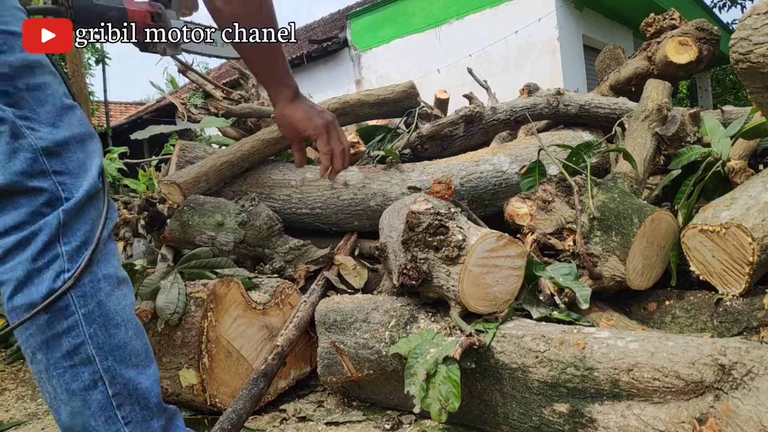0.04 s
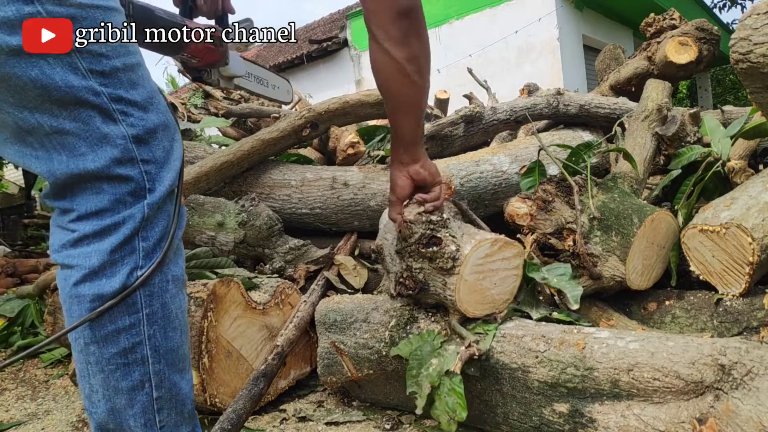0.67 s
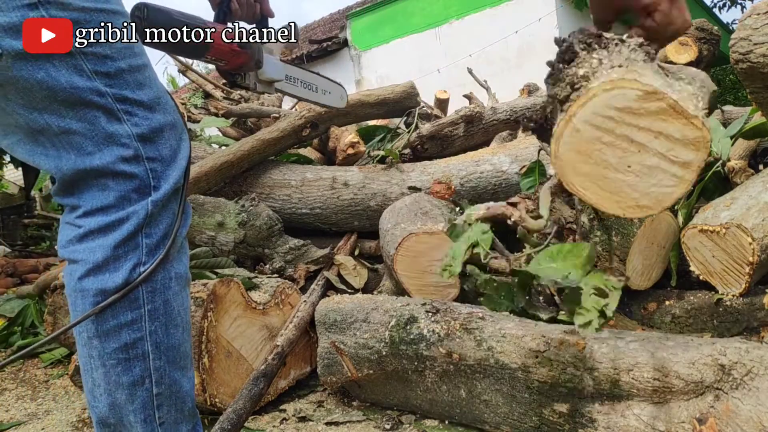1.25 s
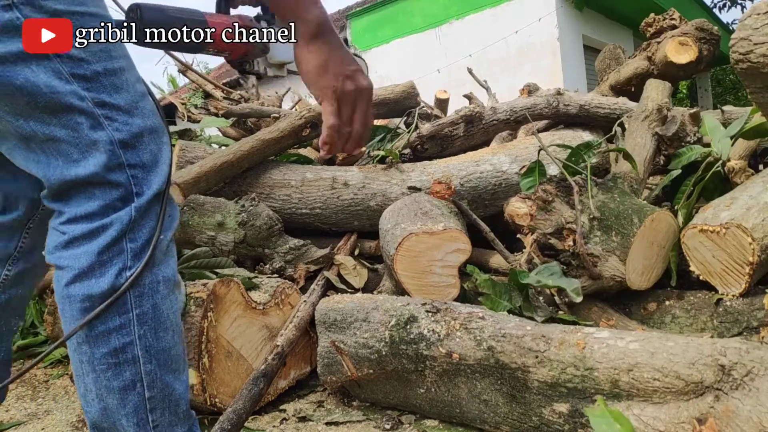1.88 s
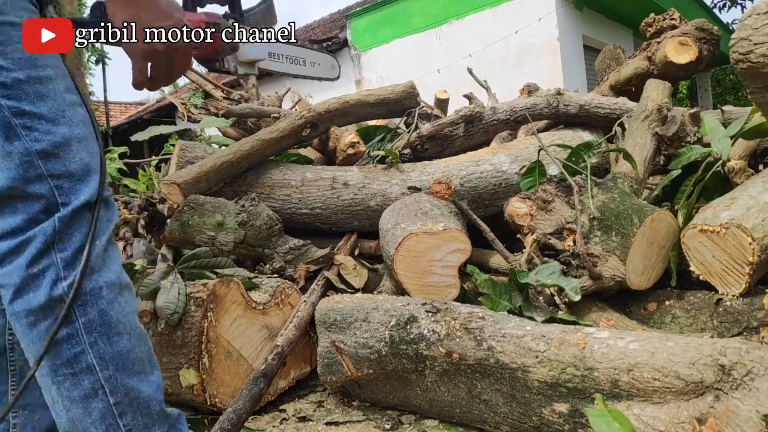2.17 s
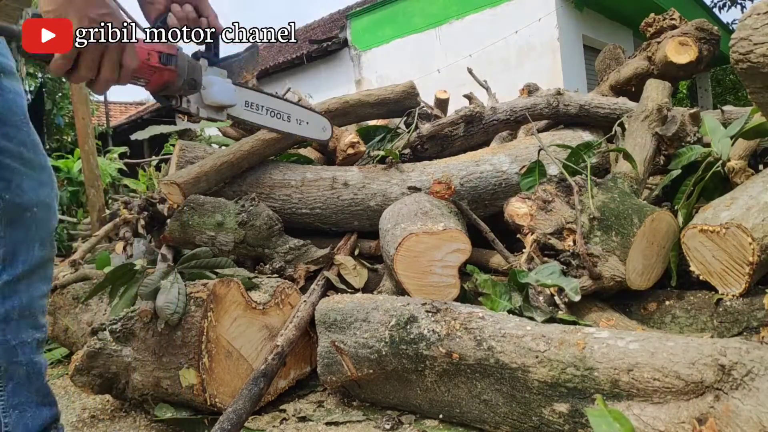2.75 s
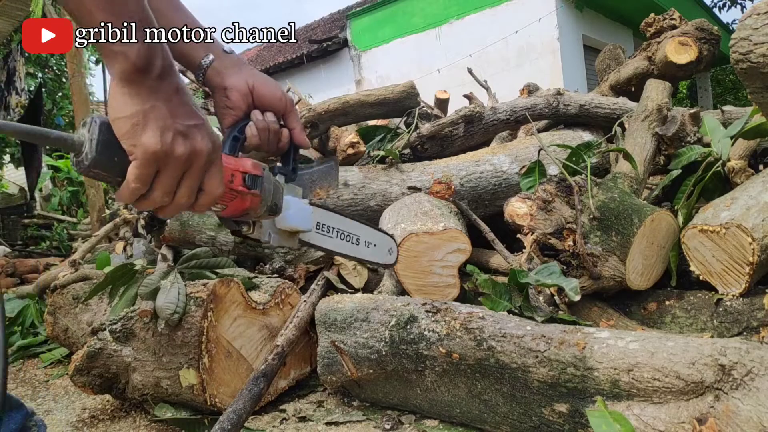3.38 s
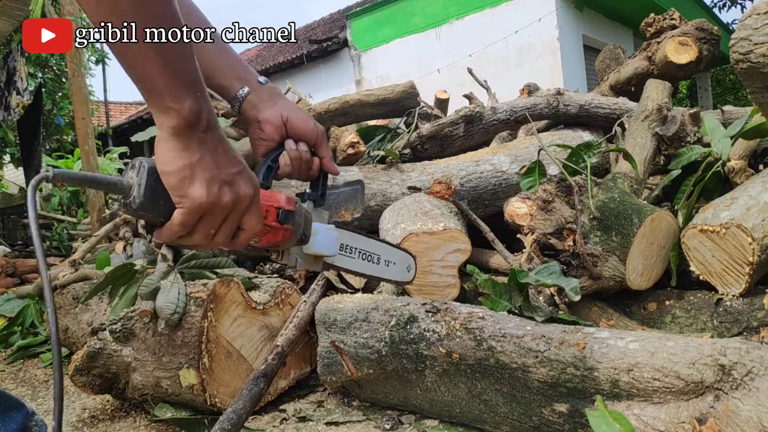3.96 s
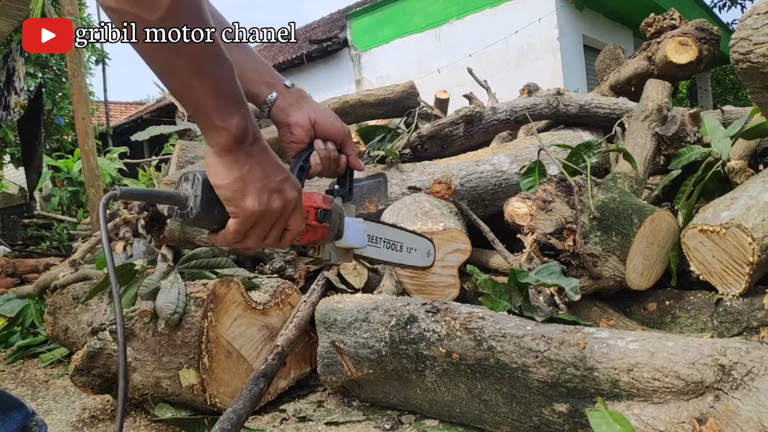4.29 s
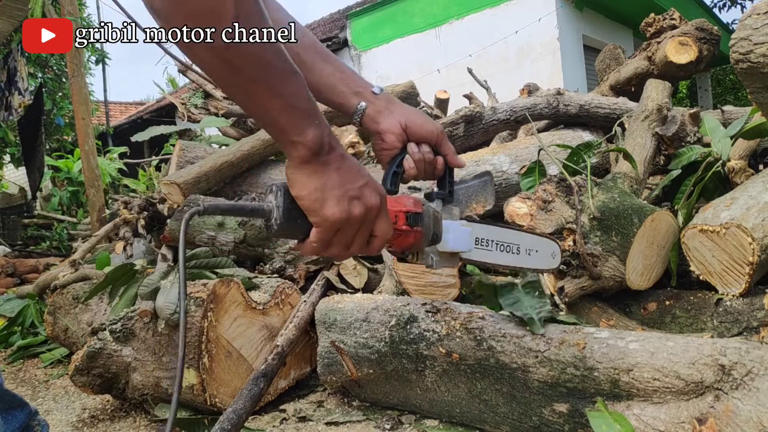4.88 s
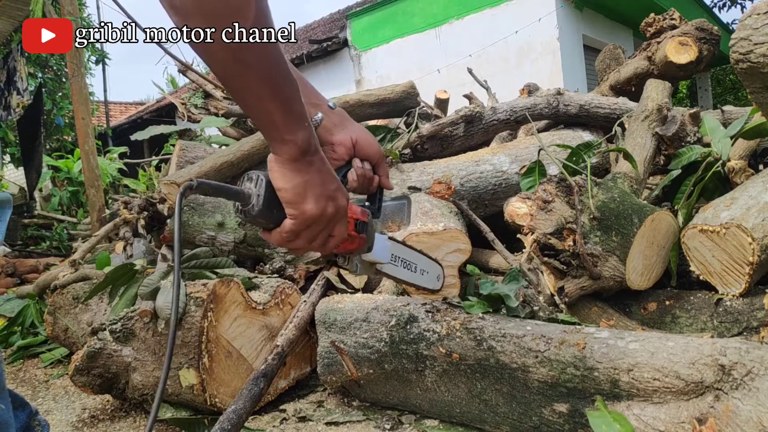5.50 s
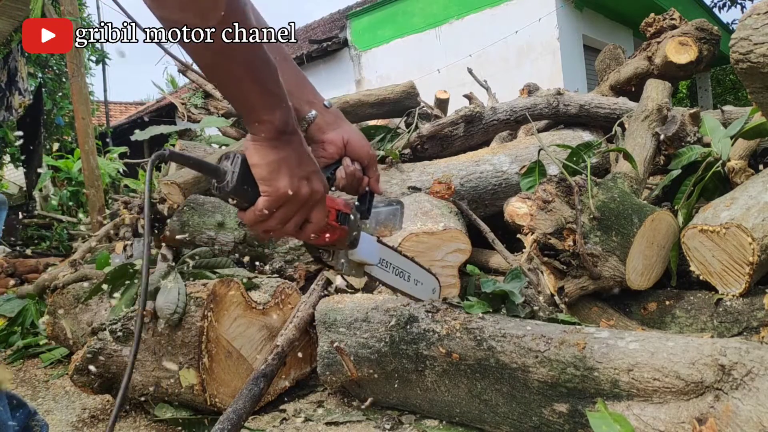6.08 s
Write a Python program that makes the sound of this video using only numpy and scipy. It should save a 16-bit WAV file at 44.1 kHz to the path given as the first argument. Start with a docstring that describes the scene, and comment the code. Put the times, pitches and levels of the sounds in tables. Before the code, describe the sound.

A corded electric chainsaw is already running at the start and continues for the whole six seconds, loud and close, outdoors. It spins free with a dense, bright hiss of rushing air and sliding steel, a fast chain rattle and a high motor whine that swells and fades at a nearly steady pitch. Short, narrow rasps flare now and then as the chain rubs its bar. At about 1.7 seconds a tossed log lands on the ground with one dull thump. Around 2.5 to 3 seconds the gear whine stands out a little more as the saw swings round. The sound drifts from the left to the centre by about 4.5 seconds. At about 5.5 seconds the chain meets wood: the sizzle grows, the whine turns hoarse, and from 5.8 seconds the pitch falls as the motor slows. A very faint low rumble lies underneath throughout.

```python
"""Outdoors at a log pile, an angle grinder fitted with a chainsaw bar runs free, is lowered and slows as
it starts to cut. Fan, commutator and gear whine over rushing air; the chain rattles and sizzles round
the bar in a repeating pattern and rubs it in narrow rasps. A tossed log thumps on the ground, and a
faint rumble lies under it all. The saw moves from the left to the front of two close microphones."""
import sys
import numpy as np
from scipy import signal
from scipy.fft import rfft, irfft, next_fast_len
from scipy.io import wavfile
from scipy.ndimage import uniform_filter1d, map_coordinates

SR = 44100
rng = np.random.default_rng(int(sys.argv[2]) if len(sys.argv) > 2 else 0)


def generate_wav(signal):
    """Clip the signal to [-1, 1] and save it as 16-bit WAV at the path in sys.argv[1]."""
    frames = np.transpose(np.atleast_2d(signal))
    scaled = np.clip(frames, -1, 1) * 32767
    pcm = np.round(scaled).astype(np.int16)
    wavfile.write(sys.argv[1], SR, pcm)


N = 275184

FAN_BLADES, COMMUTATOR_BARS, PINION_TEETH, CROWN_TEETH, SPROCKET_TEETH, LINKS = 12, 24, 13, 37, 6, 45
TURN_S, TURN_WIDTH_S = 2.6, 0.63  # the saw swings round, gear side to the mics
CUT_S, BITE_S = 5.53, 0.39  # the chain meets the wood; time to full load

# low outdoor bed: f/Hz, level/dB
YARD_SPECTRUM = [(10, -30), (25, -1), (45, -8), (68, -0.5), (100, -3), (155, -23), (200, -5.5), (300, -7.5),
                 (450, 2), (600, -7), (900, -29), (1500, -120)]
# soft low swells: t/s, level/dB, width/s, f/Hz
SWELLS = [(1.26, -56, 0.15, 243), (2.5, -62, 0.37, 65), (3.58, -55, .025, 180), (3.62, -53.5, 0.066, 68.5),
          (4.52, -52, 0.054, 60), (4.66, -52, 0.075, 44.9), (5.23, -61, 0.035, 230),
          (5.95, -64, 0.097, 230.4)]
# motor shaft speed, sagging a little, then bogging down in the cut: t/s, f/Hz
SHAFT_SPEED = [(0, 395.4), (.8, 395.5), (.92, 394.1), (1.3, 394.6), (2.0, 393.1), (3.15, 392.7),
               (3.3, 390.8), (3.75, 390.4), (4.05, 388.4), (4.55, 388.6), (5.15, 386.8), (5.68, 388.7),
               (5.8, 384), (5.88, 377), (6.0, 355), (6.1, 339), (6.24, 320)]
# the saw's direction: t/s, lead at the left mic/ms
LEFT_LEAD = [(0, 0.2), (.6, 0.13), (1.8, 0.082), (2.8, 0.15), (4, 0.052), (4.6, 0.02), (5, -0.074),
             (5.4, -0.023), (6.24, 0.02)]
# how far the saw is down among the logs: t/s, lowered/0-1
LOWERING = [(0, 0.07), (2.2, 0), (2.8, 0.27), (3.3, 0.43), (4, 0.7), (4.5, 0.7), (6.24, 1)]
# chain and air noise grow as the saw comes nearer: t/s, level/dB
NEARNESS = [(0, -3), (.25, -1.5), (.9, -0.8), (1.5, -0.5), (1.8, 0.3), (2.05, -1.3), (2.8, 0.77),
            (3.6, 2.25), (4.4, 1.1), (5.1, 1.5), (6.24, -0.5)]
# stereo tilt, saw held high and held low: f/Hz, left minus right/dB
TILT_HIGH = [(150, -1), (400, -0.5), (1000, -1), (2000, -0.5), (4000, -0.5), (7000, -3.5), (8500, 1),
             (9500, 4), (10500, 9), (12000, 15), (15000, 15)]
TILT_LOW = [(150, 2), (400, 3.5), (1000, 2.5), (2000, 2.5), (4000, -1), (5500, 0), (7100, -8.5),
            (8500, 1.5), (9500, 3), (10500, 9), (12000, 9), (15000, 11)]
# sound that arrives straight: f/Hz, share of power/0-1
DIRECT_SHARE = [(300, 1), (800, 0.6), (1600, 0.7), (3500, 0.49), (7000, 0.084), (14000, 0.098)]
# mix of the noise layers, by name: held high/dB, held low/dB, extra swung round/dB, extra under load/dB
LAYER_MIX = {"rattle": (-30, -30, 0.5, 0), "rush": (-23.5, -22.5, 0.5, 0.9),
             "sizzle": (-19.5, -19.5, -0.5, 3)}
# uneven drag of the chain: rate/cycles per chain loop, relative depth
DRAG_CYCLES = [(1, 0.04), (2, 0.048), (3, 0.045), (4, .035), (5.5, 0.04), (7.5, 0.075), (9, 0.03),
               (45, 0.03)]
# ring of bar and guard, held high and held low: f/Hz, width/Hz, level/dB
BAR_MODES_HIGH = [(796, 70, -22), (1355, 210, 1.5), (1650, 38, -2), (1896, 110, 7.5), (2060, 55, 8.5),
                  (2320, 82, -1), (2680, 150, 2), (3360, 230, 6.5)]
BAR_MODES_LOW = [(930, 210, -3.5), (1386, 94, -6.5), (1590, 41, -4.5), (1744, 60, 3), (2217, 54, 2),
                 (3120, 370, -6.5)]
# dull scrape of the links in the groove: f/Hz, level/dB
SCRAPE_SPECTRUM = [(150, -28), (250, -16.5), (400, -18), (580, -9), (750, 0), (1000, -9), (1300, -0.5),
                   (2000, 2.5), (2700, 2.5), (3500, -9), (6000, -120)]
# tones of links and cutters: rate/cycles per chain loop, relative level/dB
CHAIN_TONES = [(41, -29), (43, -27), (48, -25), (50, -29), (55, -29), (60, -23.5), (67, -24), (72, -23),
               (73, -16.5), (74.5, -21), (75, -21), (77, -23), (85.5, -21), (88, -16.5), (90, -14.5),
               (96, -19), (112, -12.5), (113, -19)]
# vent air, held high and held low: f/Hz, level/dB
RUSH_HIGH = [(1400, -32), (2450, -10), (2900, 2.5), (3400, -2), (4100, -1), (4800, -1.5), (5600, -2.5),
             (6500, -0.5), (7600, -3.5), (8500, -8.5), (11000, -42), (18000, -120)]
RUSH_LOW = [(1400, -38), (2450, -6), (3100, -1), (3600, -0.5), (4500, 1), (5600, -3.5), (6500, -1),
            (7300, 0), (8500, -4.5), (11000, -29), (18000, -120)]
# sliding steel, held high and held low: f/Hz, level/dB
SIZZLE_HIGH = [(4590, -32), (7800, -2.5), (8720, 0), (9150, -0.5), (10600, 2.5), (11500, 0), (13300, 1),
               (14600, 0.5), (15400, -2.5), (16000, -9)]
SIZZLE_LOW = [(4590, -30), (7800, -3.5), (8880, -1.5), (9630, -0.5), (12600, -1), (13900, 0), (14900, -1.5),
              (15500, -1), (16000, -2)]
# the sizzle's top end, brighter when the bar faces the mics: t/s, level/dB
GLINT = [(0, -3.5), (1, -1.5), (1.7, 0), (3.3, 0.7), (4.6, -1.5), (5.2, -2.5), (6.24, -4.5)]
# fan whine, swelling and fading as the tool turns: t/s, left level/dB, right level/dB
FAN_LEVEL = [(0, -42, -44), (.2, -34, -39), (.35, -35.5, -41), (.48, -33.5, -40), (.88, -37, -42),
             (1.0, -32, -43), (1.3, -35, -42), (1.65, -35, -37), (2.22, -30, -30.5), (2.36, -39, -40),
             (2.6, -36.5, -42), (2.9, -35, -38), (3.1, -40, -40), (3.28, -36.5, -29.5), (3.55, -33.5, -34),
             (4.1, -46, -47), (4.4, -38, -39), (5.0, -40, -42), (5.22, -33.5, -27), (5.55, -30.5, -32.5),
             (5.78, -31, -29.5), (5.95, -38, -36), (6.24, -38, -33)]
# thin commutator whine, coming and going as the vents turn: t/s, level/dB
COMMUTATOR_LEVEL = [(0, -40), (.8, -40), (.93, -33.5), (1.15, -39), (1.4, -33.5), (1.65, -42), (2.0, -35.5),
                    (2.3, -33.5), (2.5, -42), (2.95, -38), (3.3, -42), (3.48, -32.5), (3.9, -34),
                    (4.1, -46), (4.45, -46), (4.6, -36), (4.92, -31.5), (5.15, -42), (5.8, -34),
                    (6.24, -50)]
# the bevel gear sings when facing the mics and under load: t/s, level/dB
GEAR_LEVEL = [(0, -48), (.65, -43), (1.1, -49), (2.4, -49), (2.6, -38.5), (3.15, -36), (3.4, -46),
              (4.1, -45), (4.25, -39), (4.55, -43), (5.8, -44), (5.97, -35), (6.24, -33.5)]
# hum of the unbalanced shaft: t/s, level/dB
HUM_LEVEL = [(0, -57), (1.0, -53.5), (1.8, -52), (2.6, -55), (3.1, -51), (3.4, -54), (3.7, -58), (4.1, -62),
             (5.7, -65), (5.92, -58), (6.24, -67)]
# links passing the sprocket, strong in the swing and the bite: t/s, level/dB
LINK_LEVEL = [(0, -57), (2.2, -55), (2.65, -46), (3.15, -45), (3.5, -50), (4.8, -48), (5.6, -44.5),
              (5.95, -41.5), (6.24, -43)]
# the chain rubs the bar and one resonance flares: t/s, level/dB, width/s, f/Hz
RUBS = [(.16, -40, 0.087, 1410), (.6, -33, .45, 10200), (.7, -42, .3, 2040), (1.76, -35, 0.035, 3170),
        (1.8, -39, 0.15, 1350), (2.2, -30.5, 0.076, 2890), (2.68, -33, 0.02, 2050), (3.3, -35.5, 0.2, 1640),
        (3.7, -40, .3, 2060), (3.7, -45, .15, 3500), (4.17, -38, .08, 3130), (4.38, -37, 0.2, 1345),
        (4.55, -35.5, 0.44, 1695), (4.67, -34, 0.065, 3220), (4.93, -29, 0.14, 7200),
        (5.31, -30, 0.039, 3310), (5.6, -30, .03, 3520), (5.7, -38, 0.19, 1370), (5.8, -40, 0.25, 1820),
        (5.83, -31, .025, 3180)]
# the log's impacts: t/s, thud level/dB, relative knock level/dB
LOG_HITS = [(1.671, -31, -38), (1.6857, -27, -14.5), (1.6902, -29, -9.5), (1.705, -44, -34),
            (1.746, -39, -27)]
# ring of the log: f/Hz, relative level/dB, t60/s
WOOD_MODES = [(206, 3.5, 0.044), (260, 5.5, 0.043), (318, 5, 0.092), (398, 7, 0.047), (444, 2.5, 0.053),
              (500, 0.5, 0.055)]


def amp(db):
    """Decibels to gain."""
    return 10 ** (np.asarray(db) / 20)


def unit(x):
    """Scale to rms 1."""
    return x / np.sqrt(np.mean(x ** 2) + 1e-20)


def along(points, hz):
    """Read (f, value) points on a log frequency axis."""
    f, values = np.transpose(points)
    return np.interp(np.log(hz + 1), np.log(f + 1), values)


def curves(rows):
    """One automation curve for each column after the time."""
    times, *columns = np.transpose(rows)
    return [np.interp(np.arange(N) / SR, times, column) for column in columns]


def bell(at_s, width_s):
    """A bell-shaped fade in and out."""
    return np.exp(-((np.arange(N) / SR - at_s) / width_s) ** 2)


def wobble(rate):
    """A smooth random curve, rate knots a second."""
    at = np.arange(0, N + 64, 64)
    knots = rng.standard_normal(int(N * rate / SR) + 4)
    return np.interp(np.arange(N), at, map_coordinates(knots, [at * rate / SR]))


def filtered(x, response):
    """EQ x with a gain that is a function of frequency."""
    size = next_fast_len(N + 8192, True)
    gain = response(np.fft.rfftfreq(size, 1 / SR)).astype(np.complex64)
    return irfft(rfft(x.astype(np.float32), size) * gain, size)[..., :N]


def coloured(x, spectrum):
    """x shaped by a spectrum table, at rms 1."""
    return unit(filtered(x, lambda hz: amp(along(spectrum, hz))))


def ringing(x, modes):
    """x through a bank of resonances whose powers add, at rms 1."""
    def power(f):
        return sum((amp(db) * f * width) ** 2 / ((hz * hz - f * f) ** 2 + (f * width) ** 2)
                   for hz, width, db in modes)
    return unit(filtered(x, lambda f: np.sqrt(power(f))))


def blend(high, low, lowered):
    """Crossfade from the held-high colour to the held-low one, at rms 1."""
    return unit((1 - lowered) * high + lowered * low)


def arrive(x):
    """The straight path reaches the nearer mic first."""
    half_lead = curves(LEFT_LEAD)[0] * SR / 1000 / 2
    return np.array([map_coordinates(x, [np.arange(N) + side * half_lead], mode='nearest')
                     for side in (1, -1)])


def at_mics(paths):
    """Of three signals, one arrives straight and two are scattered by the logs, one to each mic."""
    straight = arrive(filtered(paths[0], lambda hz: np.sqrt(along(DIRECT_SHARE, hz))))
    return straight + filtered(paths[1:], lambda hz: np.sqrt(1 - along(DIRECT_SHARE, hz)))


def echoes(x, depth_db):
    """Fine, randomly drifting peaks and dips: the colour of echoes off the logs."""
    spectra = signal.stft(x, nperseg=1024)[2]
    ripple = uniform_filter1d(rng.standard_normal(spectra.shape), size=3, axis=1)
    ripple = unit(uniform_filter1d(ripple, size=9, axis=2))
    return unit(signal.istft(spectra * amp(depth_db * ripple), nperseg=1024)[1][:, :N])


def yard(width_db):
    """A faint bed of outdoor rumble that swells softly a few times."""
    air = lambda: rng.standard_normal(N) + amp(width_db) * rng.standard_normal((2, N))
    hump = lambda hz: [(hz / 4, -30), (hz * 0.7, -3), (hz, 0), (hz * 1.5, -14), (hz * 8, -90)]
    swells = sum(amp(db) * bell(s, width) * coloured(air(), hump(hz)) for s, db, width, hz in SWELLS)
    return amp(-59.5 + 2.9 * wobble(3.53)) * coloured(air(), YARD_SPECTRUM) + swells


def saw():
    """The motor drives the chain through a bevel gear; the stereo image shifts as the tool moves."""
    turns = np.cumsum(curves(SHAFT_SPEED)[0]) / SR
    loops = turns * PINION_TEETH / CROWN_TEETH * SPROCKET_TEETH / LINKS
    lowered = curves(LOWERING)[0]
    noise = (layer_gain("rattle", lowered) * chain_rattle(loops, lowered, repeat=0.42, ring=0.67)
             + layer_gain("rush", lowered) * vent_rush(loops, lowered)
             + layer_gain("sizzle", lowered) * groove_sizzle(loops, lowered))
    noise *= amp(curves(NEARNESS)[0]) * drag(loops, depth=0.65)
    sound = noise + bar_rubs(loops) + drive_whine(turns, loops)
    sides = np.array([[1], [-1]])
    facing = lambda tilt: filtered(sound, lambda hz: np.sqrt(2 / (1 + amp(-2 * sides * along(tilt, hz)))))
    tilted = (1 - lowered) * facing(TILT_HIGH) + lowered * facing(TILT_LOW)
    pan_db = -1 + 10.5 * curves(LEFT_LEAD)[0]  # left minus right
    return tilted * amp(sides * pan_db / 2)


def load():
    """0 while the chain runs free, 1 once it has bitten in."""
    return np.clip((np.arange(N) / SR - CUT_S) / BITE_S, 0, 1)


def layer_gain(name, lowered):
    """A layer's fader follows how the saw is held and how hard it cuts."""
    high_db, low_db, turn_db, load_db = LAYER_MIX[name]
    held_db = high_db + (low_db - high_db) * lowered
    return amp(held_db + turn_db * bell(TURN_S, TURN_WIDTH_S) + load_db * load())


def drag(loops, depth):
    """The chain tightens and slackens with each loop, sprocket turn and cutter."""
    tension = sum(share * np.cos(2 * np.pi * (rate * loops + rng.random()))
                  for rate, share in DRAG_CYCLES)
    return np.exp(depth * tension)


def link_hits(loops, scatter_db, fade):
    """Envelope of the links: each strikes at a new strength and fades until the next."""
    link = loops * LINKS
    strengths = amp(scatter_db * rng.standard_normal(4096))
    return unit(strengths[link.astype(int) % len(strengths)] * np.exp(-fade * (link % 1)))


def link_noise(loops, scatter_db, fade):
    """Stereo noise that pulses with every link."""
    return at_mics(link_hits(loops, scatter_db, fade) * rng.standard_normal((3, N)))


def tone(cycles, flutter_db, blur_rad):
    """A sine of rms 1 whose level and phase waver."""
    flutter = amp(flutter_db * wobble(14))
    return unit(flutter * np.sin(2 * np.pi * (cycles + rng.random()) + blur_rad * wobble(60)))


def chain_rattle(loops, lowered, repeat, ring):
    """Links ring the bar, scrape and sing; part of the pattern comes back every second loop."""
    pattern = np.array([np.interp(loops / 2 % 1 * len(grain), np.arange(len(grain)), grain)
                        for grain in rng.standard_normal((3, 4800))])
    strikes = link_hits(loops, scatter_db=1.7, fade=0.55)
    grit = np.sqrt(repeat) * pattern + np.sqrt(1 - repeat) * rng.standard_normal((3, N))
    blows = at_mics(strikes * grit)
    bar = blend(ringing(blows, BAR_MODES_HIGH), ringing(blows, BAR_MODES_LOW), lowered)
    # a small bar radiates little bass
    bar = coloured(bar, [(100, -70), (500, -10), (800, -3.5), (3200, 2.0), (4500, -15), (9000, -48)])
    scrape = coloured(at_mics(strikes * rng.standard_normal((3, N))), SCRAPE_SPECTRUM)
    tones = sum(amp(db) * tone(rate * loops, flutter_db=3.5, blur_rad=0.46) for rate, db in CHAIN_TONES)
    clatter = np.sqrt(ring) * bar + np.sqrt(1 - ring) * scrape
    return echoes(clatter, depth_db=1.5) + amp(-3.5) * arrive(tones)


def vent_rush(loops, lowered):
    """Cooling air leaves the vents, mixed with the chain's clatter."""
    air = link_noise(loops, scatter_db=1, fade=0.26)
    return echoes(blend(coloured(air, RUSH_HIGH), coloured(air, RUSH_LOW), lowered), depth_db=3.0)


def groove_sizzle(loops, lowered):
    """Steel slides in the bar's groove in tiny bright bursts."""
    bursts = link_noise(loops, scatter_db=1.23, fade=0.36)
    hiss = blend(coloured(bursts, SIZZLE_HIGH), coloured(bursts, SIZZLE_LOW), lowered)
    top = filtered(hiss, lambda hz: np.interp(hz, [10500, 13000], [0, 1]))
    return unit(hiss + (amp(curves(GLINT)[0]) - 1) * top)


def stereo_whine(cycles, left_lead_rad=0.69, sway_db=1.8, sway_rad=0.5):
    """One high tone: echoes sway its level and phase at each mic, and load turns it hoarse."""
    blur_rad = 0.28 + 0.22 * load()
    phase = 2 * np.pi * (cycles + rng.random()) + blur_rad * wobble(200)
    return np.array([unit(amp(sway_db * wobble(12)) * np.sin(phase + lead + sway_rad * wobble(6)))
                     for lead in (left_lead_rad, 0)])


def drive_whine(turns, loops):
    """Fan blades, commutator bars, gear teeth, shaft unbalance and links each sing one tone."""
    fan = amp(curves(FAN_LEVEL)) * stereo_whine(FAN_BLADES * turns)
    commutator = amp(curves(COMMUTATOR_LEVEL)[0]) * stereo_whine(COMMUTATOR_BARS * turns)
    gear = amp(curves(GEAR_LEVEL)[0]) * stereo_whine(PINION_TEETH * turns)
    hum = amp(curves(HUM_LEVEL)[0]) * tone(turns, flutter_db=1.5, blur_rad=0.04)
    links = amp(curves(LINK_LEVEL)[0]) * tone(LINKS * loops, flutter_db=2.6, blur_rad=0.084)
    return fan + commutator + gear + arrive(hum + links)


def bar_rubs(loops, q=9.8):
    """The chain sways against the bar, which flares up in pulsing, narrow rasps."""
    grit = link_noise(loops, scatter_db=1.0, fade=1) * drag(loops, depth=1.2)
    rasp = lambda hz: unit(signal.sosfilt([np.concatenate(signal.iirpeak(hz, q, SR))] * 2, grit))
    return sum(amp(db) * bell(s, width) * rasp(hz) for s, db, width, hz in RUBS)


def log_drop(ground_hz, ground_t60):
    """A log lands end first and settles: the ground thuds and the wood rings briefly."""
    out, t = np.zeros(N + SR), np.arange(SR // 2) / SR
    ring = lambda hz, t60: np.sin(2 * np.pi * hz * t) * amp(-60 * t / t60)
    attack = 1 - np.exp(-t / 0.0026)
    for s, thud_db, knock_db in LOG_HITS:
        wood = sum(amp(db + rng.normal(0, 1.6)) * ring(hz, t60) for hz, db, t60 in WOOD_MODES)
        thud = amp(thud_db) * ring(ground_hz, ground_t60)
        out[round(s * SR):][:len(t)] += (thud + amp(knock_db - 14) * wood) * attack
    return out[:N]


def scene():
    """The yard bed, the saw and the tossed log."""
    return yard(width_db=-1) + saw() + log_drop(ground_hz=62, ground_t60=0.16)


def record(dry):
    """A brick-wall low-pass at 15.8 kHz."""
    return filtered(dry, lambda hz: hz < 15800)


dry = scene()
out = record(dry)
generate_wav(out)
```